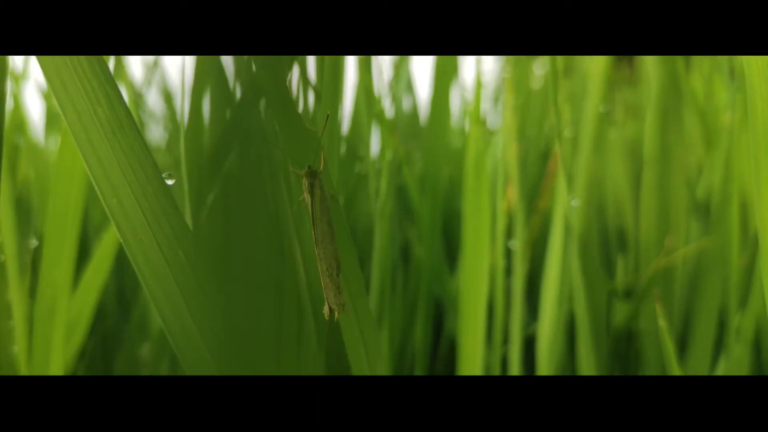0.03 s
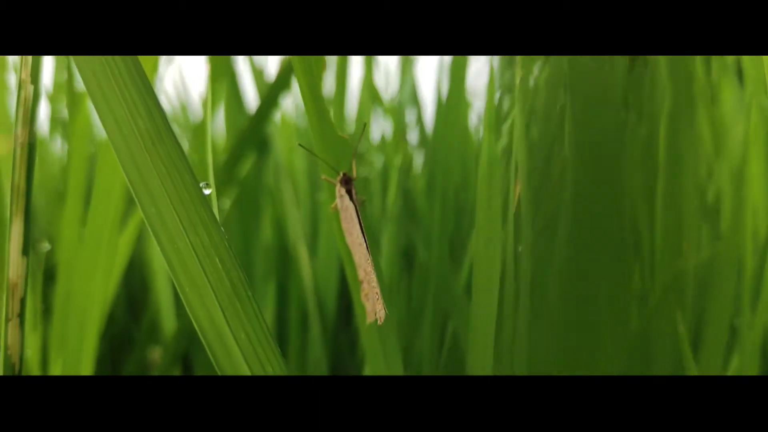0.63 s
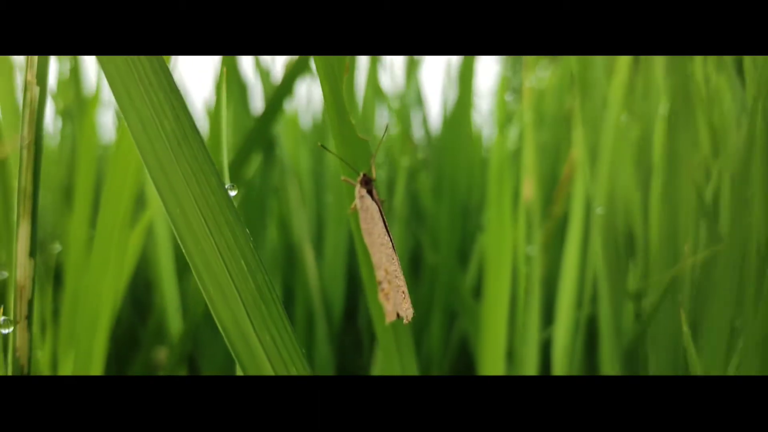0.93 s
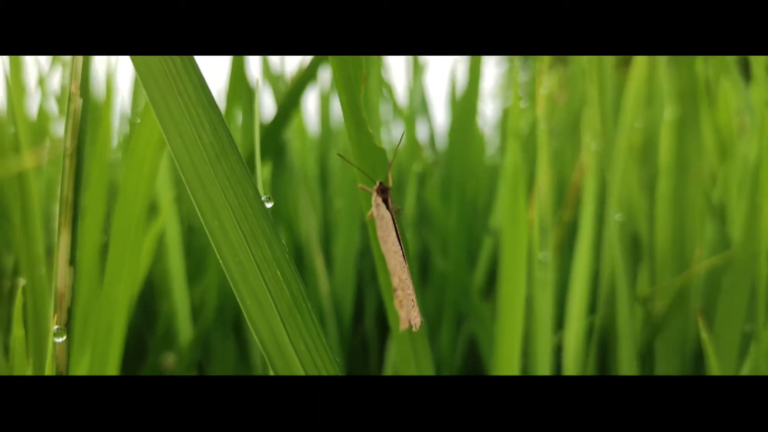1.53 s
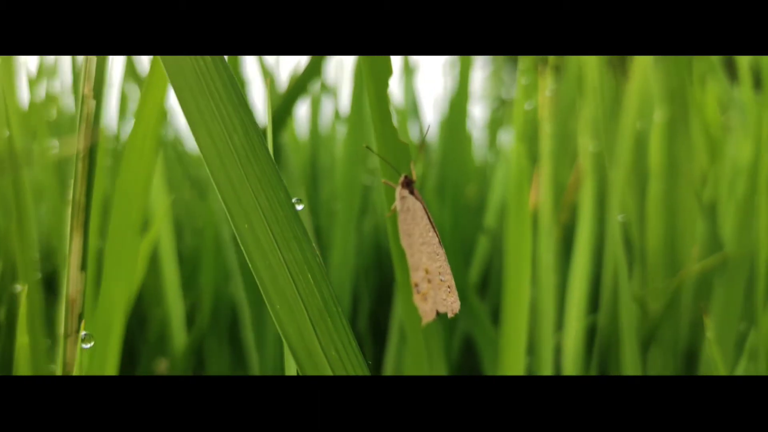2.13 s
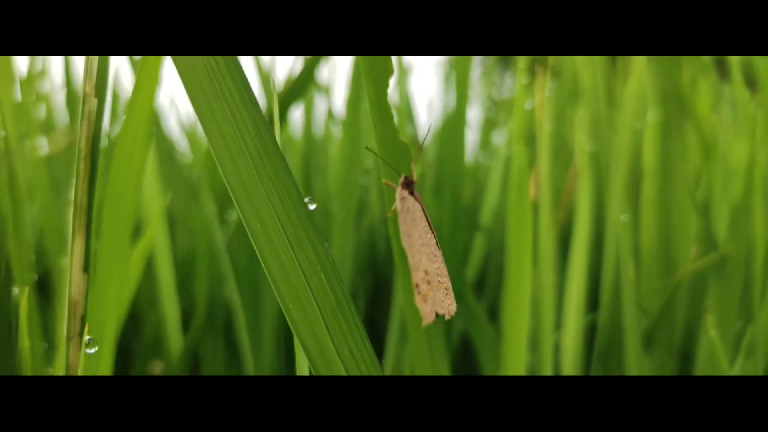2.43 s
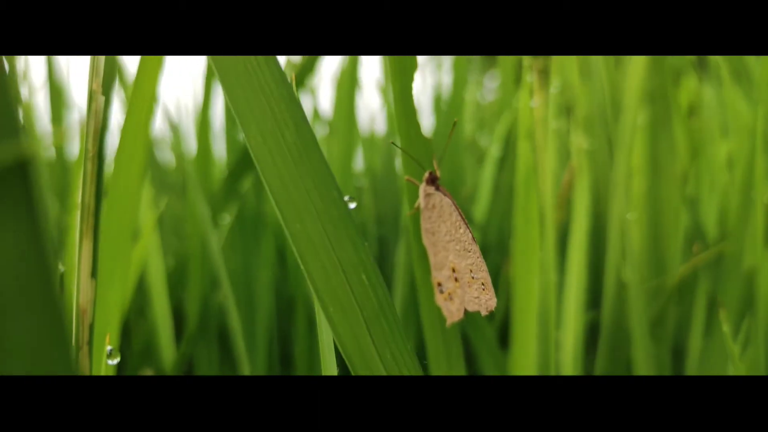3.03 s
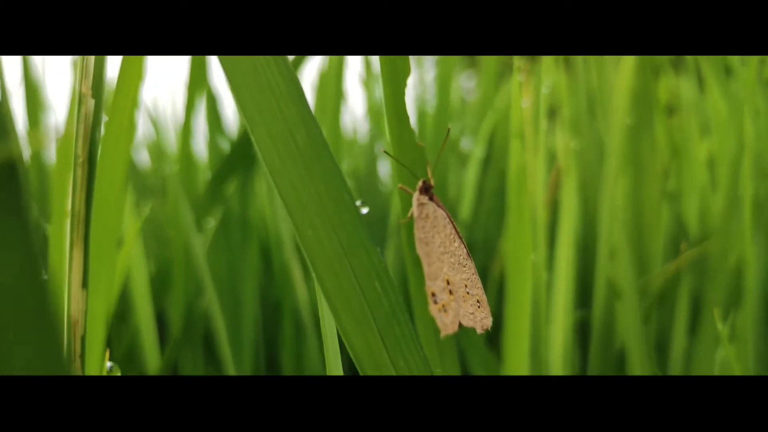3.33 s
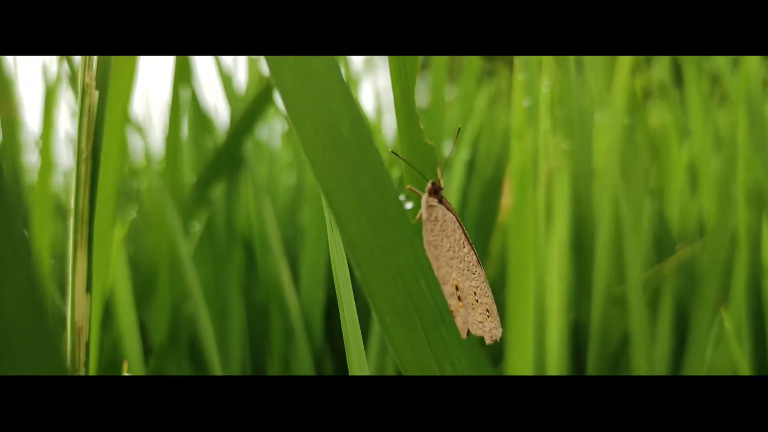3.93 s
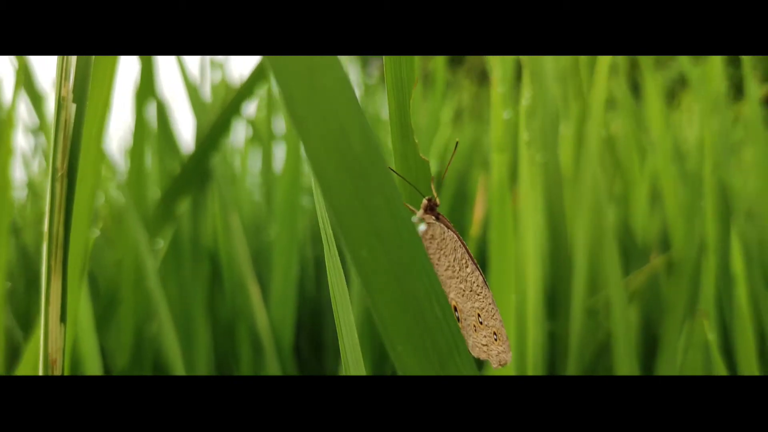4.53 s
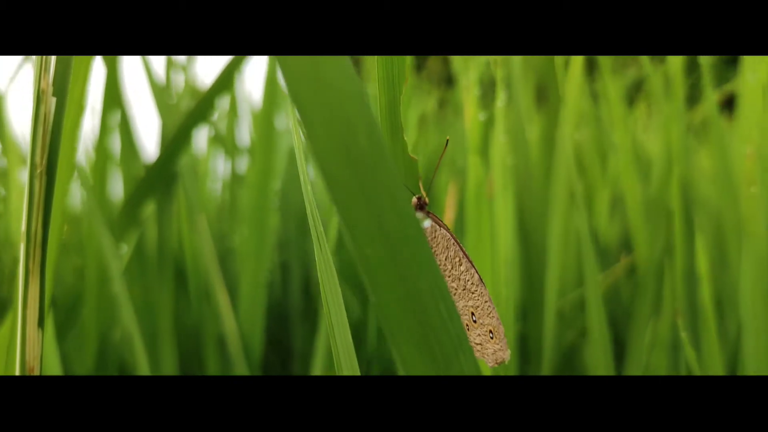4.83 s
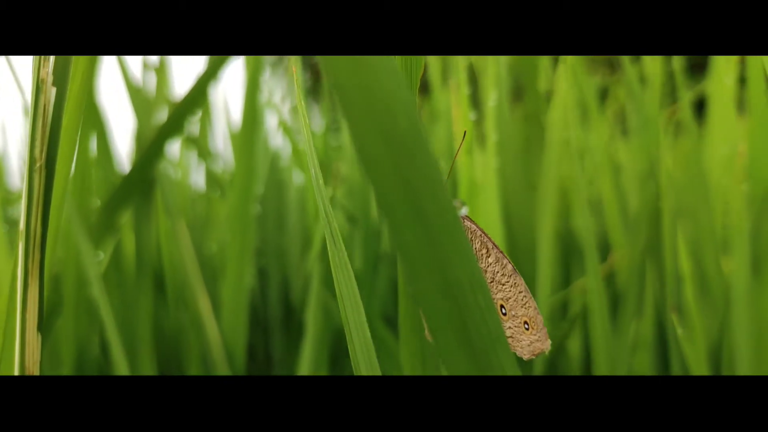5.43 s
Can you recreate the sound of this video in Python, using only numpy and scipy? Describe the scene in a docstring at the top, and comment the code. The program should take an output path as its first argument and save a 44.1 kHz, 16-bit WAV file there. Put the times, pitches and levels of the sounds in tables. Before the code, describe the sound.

Quiet outdoor chirping, a cricket and distant bird whistles, joined halfway by close leaves rubbing and clicking on the microphone, growing louder.

```python
"""Among wet rice leaves

Leaves swish past a camera, then drag and snap on its body, right beside the right microphone.
Their rough sound is many tiny clicks, made as they stick and slip. Small creatures chirp in quick
falling notes and a cricket throbs. Far off, a bird whistles and two hollow thumps sound, the second
one doubled. Behind it all lie a faint chorus of chirps, a steady insect hiss and a low rumble."""
import sys
import numpy as np
from scipy import signal
from scipy.fft import rfft, irfft
from scipy.io import wavfile
from scipy.ndimage import uniform_filter1d

SR = 44100
rng = np.random.default_rng(int(sys.argv[2]) if len(sys.argv) > 2 else 0)


def transcribe(u):
    """Save the signal u as a 16-bit wav file named by the first command-line argument.

    u: samples, shape (n,) or (channels, n), limited to [-1, 1]; the rate is SR.
    q: integer samples, one column per channel.
    """
    v = np.clip(np.atleast_2d(u).T, -1, 1)
    q = np.round(v * 32767).astype(np.int16)
    wavfile.write(sys.argv[1], SR, q)


N = 246078
TIME = np.arange(N) / SR

# A level_db sets a sound's strength before filters and echoes. A pan_db above zero means more left.
# leaves dragging on the camera body: start_s, end_s, level_db, swell_db (change from start to end)
LEAF_DRAGS = [(3.133, 3.175, -59, -17), (3.27, 3.34, -53.5, -14), (3.44, 3.505, -50.5, -8),
              (3.68, 3.73, -61, -9), (3.811, 3.91, -42.5, -11.5), (3.97, 4.11, -46.5, -3),
              (4.15, 4.247, -43.5, 7.5), (4.461, 4.555, -40, -4), (4.707, 4.8, -41, -4.5),
              (4.873, 4.95, -39, -11.5), (4.996, 5.032, -44.5, -2), (5.088, 5.29, -43.5, 13),
              (5.432, 5.531, -39, -7.5)]
# leaf edges snapping free: time_s, level_db, bass_boost_db
LEAF_SNAPS = [(3.1722, -29.5, 22), (3.4774, -23.5, 26), (3.7029, -33, 22), (3.9793, -29.5, 2),
              (4.0567, -26, 18), (4.2026, -26, -9), (4.2602, -33, -9), (4.2783, -29.5, 0),
              (4.2916, -27.5, 1), (4.308, -32.5, 15), (4.613, -26, 8), (4.6332, -26, -1), (4.6747, -33, 3),
              (4.7073, -25.5, -21), (4.879, -40, 17), (4.926, -23.5, 14), (5.0113, -24.5, 8),
              (5.094, -30, -11), (5.146, -28, -4), (5.1793, -19, 2), (5.2517, -20.5, 1), (5.33, -35, 7),
              (5.3845, -16.5, 1), (5.4474, -9, 4), (5.5147, -21.5, -3)]
# tone of the camera body when touched: frequency_hz, level_db
BODY_TONE = [(80, -11.5), (190, 5.5), (450, 5), (750, 2), (1700, 0), (1950, -4), (3100, -5.5), (3700, -3),
             (4900, -10.5), (6900, -8), (7700, -19.5), (9300, -27.5), (12000, -32), (15500, -50)]
# tone of one bright tick: frequency_hz, level_db
TICK_TONE = [(300, 7), (1500, 8.5), (5000, 1), (10000, 1), (15500, -7)]
# leaves sliding past: start_s, end_s, level_db, pan_db
LEAF_SWISHES = [(0.733, 0.752, -51, -9), (1.257, 1.33, -62.5, -4), (1.647, 1.69, -63, -12),
                (2.314, 2.377, -56.5, -5), (2.568, 2.593, -55.5, -7.5), (2.87, 2.91, -57.5, -7),
                (2.993, 3.1, -60.5, -2), (3.136, 3.146, -53, 1), (3.271, 3.288, -52, 2),
                (3.439, 3.494, -55, -3), (3.811, 3.873, -50, -2)]
# tone of a sliding leaf: frequency_hz, level_db
LEAF_TONE = [(200, 10.5), (900, -2), (2000, -2.5), (3700, 7.5), (4300, 3.5), (5000, 9), (6000, 1),
             (7200, 6.5), (9000, 2.5), (11000, -5), (15500, -13)]
# short runs of chirps from several callers: time_s, note_count, pitch_hz, level_db, pan_db
CHIRP_PHRASES = [(-.045, 3, 3146, -54, 6.5), (0.039, 1, 3100, -53, -5), (0.174, 2, 2990, -64, 5),
                 (0.338, 3, 3140, -54.5, 2), (.831, 2, 3060, -62, 11), (1.04, 2, 3120, -53.5, -4),
                 (1.128, 3, 3130, -56, 3), (1.382, 3, 3073, -61, 8), (1.553, 1, 3073, -50.5, 2),
                 (1.814, 2, 3110, -55, 7), (2.26, 2, 3123, -54.5, 6), (2.377, 1, 3057, -49, 3),
                 (2.636, 2, 3200, -55.5, 4), (2.95, 2, 3200, -52, 2.5), (3.354, 2, 3210, -57.5, 1),
                 (3.562, 3, 2960, -63, 4), (4.029, 2, 3116, -54.5, 7.5), (4.366, 2, 3166, -55.5, 8),
                 (4.829, 2, 3090, -51, 7), (5.084, 2, 2930, -60, 11), (5.486, 1, 3220, -52, 11)]
# spells of cricket song: first_throb_s, last_throb_s, throb_count, level_db
CRICKET_BOUTS = [(.03, 1.56, 13, -63), (3.49, 3.83, 3, -64), (4.02, 5.47, 12, -62)]
# the cricket's pitch over time: time_s, pitch_hz
CRICKET_PITCH = [(0, 8420), (1.6, 8230), (3.6, 8040), (5.5, 8100)]
# distant thumps: start_s, level_db, pitch_hz, half_length_s
FAR_THUMPS = [(1.886, -30, 298, 0.021), (2.778, -40.5, 375, 0.021), (2.821, -47.5, 400, 0.022)]
# distant bird whistles, plus one leaf squeak at 0.72 s: start_s, length_s, start_hz, end_hz, level_db
BIRD_WHISTLES = [(0.246, 0.0444, 2000, 1870, -66), (.435, .05, 2120, 2050, -62),
                 (0.547, .1, 2650, 2610, -60.5), (0.72, 0.066, 2300, 2304, -61.5),
                 (0.836, .05, 2060, 2030, -61), (1.16, 0.081, 2660, 2620, -58),
                 (1.91, 0.056, 2644, 2660, -56), (2.617, 0.089, 2620, 2610, -57),
                 (3.322, 0.11, 2610, 2540, -59.5), (3.898, 0.08, 4450, 3950, -56),
                 (4.267, 0.078, 3650, 4730, -60)]
# loudness of the distant chorus: time_s, level_db
CHORUS_LEVEL = [(0, -67), (1.5, -65.5), (2.05, -66.5), (3.6, -65), (5.5, -66)]
# bands of insect hiss: centre_hz, width_hz, level_db, pan_db, swell_db
INSECT_BANDS = [(6340, 980, -70, -0.5, 2), (9000, 2170, -73, 13, 0)]
# tone of the distant rumble: frequency_hz, level_db
RUMBLE_TONE = [(20, -4), (45, -3.5), (80, 0), (150, -3.5), (220, -10), (400, -16.5), (700, -20.5),
               (1200, -25), (2300, -28.5), (4500, -31), (7500, -36), (10000, -39), (11200, -41),
               (15500, -41)]
# how much of the rumble both sides share: frequency_hz, share (0 to 1)
RUMBLE_SHARE = [(30, 0.04), (70, 0.35), (140, 0.47), (300, 0.33), (700, 0.03), (1400, 0)]


def leaf_pressure(graze_from_s=2.85, graze_db=-59.5):
    """How hard the leaves press on the camera: unsteady strokes over a light, wavering touch."""
    graze = (TIME > graze_from_s) * from_db(graze_db + 2 * drift(24.93))
    return strokes(LEAF_DRAGS, attack_s=.0049, release_s=.025) * from_db(2.27 * drift(90)) + graze


def leaf_rubbing(pressure):
    """Leaves judder over the camera body, which gives their tiny slips its own tone."""
    slips = friction(slips_per_s=3500, grain_db=2.6, judder_db=2.2, judders_per_s=300)
    # the touching point wanders along the leaf, so its papery ringing comes and goes
    rings = sum(drift(35) * resonate(slips, hz, sharpness=12) for hz in np.geomspace(450, 4500, 12))
    sound = coloured(slips + .8 * rings, BODY_TONE)
    # even out the level, so that the pressure alone sets the loudness
    local_level = np.sqrt(uniform_filter1d(sound ** 2, size=600) + 1e-12)
    return pressure * sound / local_level


def leaf_snaps(ring_hz=760, ring_db=-7.5):
    """Leaf edges flick against the camera body, which answers with a short hollow ring."""
    out = np.zeros(N)
    for time_s, level_db, bass_db in LEAF_SNAPS:
        add(out, time_s - .001043, from_db(level_db) * snap(BODY_TONE, decay_s=.0011, bass_db=bass_db))
    out = filtered(out, 1, 300, "high")  # such light blows carry little bass
    return out + from_db(ring_db) * resonate(out, ring_hz, sharpness=3)


def leaf_flicks(pressure, per_s=40, boost_db=9):
    """Small edges catch at random, louder when the leaves press harder."""
    out = np.zeros(N)
    chances = np.clip(rng.standard_normal((N // 100, 3)), -2, 2)
    for k in range(int(per_s * N / SR)):
        late, loud, bass = chances[k]
        flick = snap(BODY_TONE, decay_s=.0008, bass_db=6 * bass)
        add(out, (k + late) / per_s, from_db(boost_db + 3 * loud) * flick)
    return out * pressure


def leaf_swishes():
    """Rough leaves slide by; their bright sound reaches both microphones through the air."""
    sides = []
    for side in (1, -1):  # left, then right
        rows = [(start, end, db + side * pan_db / 2, 0) for start, end, db, pan_db in LEAF_SWISHES]
        pressure = strokes(rows, attack_s=.0021, release_s=.012)
        slips = friction(slips_per_s=4000, grain_db=3.5, judder_db=1.5, judders_per_s=400)
        sides.append(pressure * coloured(slips, LEAF_TONE))
    return np.array(sides) * from_db(2 * drift(170))


def strokes(rows, attack_s, release_s):
    """Pressure of leaf strokes: each catches quickly, holds, swells or fades, then lets go softly."""
    out = np.zeros(N)
    for start_s, end_s, level_db, swell_db in rows:
        length_s = max(end_s - start_s, release_s)
        t = TIME[:int((length_s + release_s / 2) * SR)]
        contact = np.clip(np.minimum(t / attack_s, (length_s - t) / release_s + .5), 0, 1)
        add(out, start_s, contact * from_db(level_db + swell_db * (t / length_s - .5)))
    return out


def friction(slips_per_s, grain_db, judder_db, judders_per_s):
    """Sticking and slipping: tiny clicks of uneven size come in clumps, over a fine hiss."""
    sizes = from_db(grain_db * np.minimum(rng.exponential(1, N), 4)) * rng.choice([-1, 1], N)
    slips = rms_one(sizes * (rng.random(N) < slips_per_s / SR))
    clumps = from_db(judder_db * np.clip(drift(judders_per_s), -2, 2))
    hiss = .6 * rng.standard_normal(N)
    return rms_one((slips + hiss) * clumps)


def snap(tone, decay_s, bass_db, samples=1500):
    """A quick burst of slips as an edge lets go."""
    t = TIME[:samples]
    spectrum = rfft(rng.standard_normal(samples) * t / decay_s * np.exp(-t / decay_s))
    burst = irfft(spectrum / (np.abs(spectrum) + 1e-12), samples)  # all frequencies equally strong
    sound = coloured(burst * np.exp(-t / (10 * decay_s)), tone)
    sound = sound + (from_db(bass_db) - 1) * filtered(sound, 1, 1300, "low")
    return sound / np.sqrt(np.e * np.sum(sound ** 2) / (decay_s * SR))  # peak near one


def left_tick(start_s=4.1855, level_db=-25):
    """One bright tick at the left microphone."""
    out = np.zeros((2, N))
    add(out[0], start_s, from_db(level_db) * snap(TICK_TONE, decay_s=.0009, bass_db=0))
    return out


def chirps(note_spacing_s=.0565, step_hz=-37):
    """Small creatures call in notes that step down in pitch, each blurred by its path through leaves."""
    out = np.zeros((2, N))
    for time_s, count, pitch_hz, level_db, pan_db in CHIRP_PHRASES:
        for k in range(int(round(count))):
            fall = .22 * (1 + .15 * rng.standard_normal())
            note = falling_note(pitch_hz + step_hz * k, fall, length_s=.036)
            blurred = outdoors(note, echo_s=.09, echo_db=4.5)
            blurred /= np.sqrt(np.sum(blurred ** 2, axis=1, keepdims=True) / len(note))
            gain = from_db(level_db - 5 * abs(k - 1))  # favours the second note
            sides = panned(pan_db + 8.5 * rng.standard_normal())
            add(out, time_s + note_spacing_s * k - .024, blurred * gain * sides)
    return outdoors(out, echo_s=.15, echo_db=-3)


def falling_note(middle_hz, fall, length_s, overtone_db=-24):
    """One quick, slightly raspy downward slide; fall is the drop as a share of the middle pitch."""
    progress = np.linspace(0, 1, int(length_s * SR))
    rasp = .018 * np.interp(progress * 24, np.arange(25), rng.standard_normal(25))
    phase = phase_of(middle_hz * (1 + fall * (.5 - progress) + rasp))
    fade = signal.windows.tukey(len(progress), .5)
    return fade * (np.sin(phase) + from_db(overtone_db) * np.sin(2 * phase))


def cricket(width_hz=360, throb_width_s=.041, right_db=-12):
    """A cricket's high, narrow rasp throbs six to eight times a second, in spells."""
    power = np.zeros(N)
    for first_s, last_s, count, level_db in CRICKET_BOUTS:
        for time_s in np.linspace(first_s, last_s, int(round(count))):
            gain = from_db(level_db + .5 * rng.standard_normal())
            power += gain ** 2 * np.exp(-((TIME - time_s) / throb_width_s) ** 2)
    slow_noise = filtered(rng.standard_normal((2, 2, N)), 2, width_hz / 2, "low")
    phase = phase_of(in_time(CRICKET_PITCH))
    rasp = slow_noise[0] * np.cos(phase) + slow_noise[1] * np.sin(phase)  # noise moved up to the pitch
    return rms_one(rasp) * np.sqrt(power) * from_db([[0], [right_db]])


def thumps(echo_delay_s=.022):
    """Each distant thump is a brief, hollow low note followed by its outdoor echo."""
    direct = np.zeros(N)
    for start_s, level_db, pitch_hz, half_length_s in FAR_THUMPS:
        t = TIME[:int(2 * half_length_s * SR)]
        rise = t / (.33 * half_length_s)
        swell = rise ** 2 * np.exp(2 * (1 - rise))
        add(direct, start_s, from_db(level_db) * swell * np.sin(2 * np.pi * pitch_hz * t))
    echo = np.zeros((2, N))
    add(echo, echo_delay_s, outdoors(direct, echo_s=.43, echo_db=-4) - direct)
    return direct + echo


def bird_whistles():
    """A distant bird whistles thin, gliding notes that waver a little; a sliding leaf's short squeak is played
    the same way."""
    out = np.zeros(N)
    for start_s, length_s, start_hz, end_hz, level_db in BIRD_WHISTLES:
        n = int(length_s * SR)
        pitch_hz = np.linspace(start_hz, end_hz, n) * (1 + .005 * drift(300)[:n])
        add(out, start_s, from_db(level_db) * signal.windows.tukey(n, .5) * np.sin(phase_of(pitch_hz)))
    return outdoors(out, echo_s=.2, echo_db=-3) * from_db([[-3], [-7]])


def far_chorus(pitch_hz=3010, count=170):
    """Many more of the chirping creatures blend together far away."""
    out = np.zeros(N)
    for k, (late, sharp, loud) in enumerate(rng.standard_normal((count, 3))):
        note = falling_note(pitch_hz + 50 * sharp, fall=.13, length_s=.0455)
        add(out, (k + .3 * late) / count * N / SR, from_db(.23 * loud) * note)
    return rms_one(outdoors(out, echo_s=.25, echo_db=10)) * from_db(in_time(CHORUS_LEVEL))


def insect_hiss(first_swell_s=.41, swell_period_s=.728):
    """Countless tiny rasping insects blend into two bands of hiss; the lower one swells and sinks."""
    swell = np.cos(2 * np.pi * (TIME - first_swell_s) / swell_period_s)
    out = np.zeros((2, N))
    for centre_hz, width_hz, level_db, pan_db, swell_db in INSECT_BANDS:
        edges_hz = [centre_hz - width_hz / 2, centre_hz + width_hz / 2]
        hiss = rms_one(filtered(rng.standard_normal((2, N)), 2, edges_hz, "band"))
        out += hiss * from_db(level_db + swell_db * swell + drift(7.2)) * panned(pan_db)
    return out


def rumble(level_db=-51.5):
    """Distant rumble in the air; the two sides are partly alike, in the bass only."""
    common, left, right = rfft(rng.standard_normal((3, N)))
    share = np.clip(at_hz(RUMBLE_SHARE, np.fft.rfftfreq(N, 1 / SR)), 0, 1)
    noises = [irfft(np.sqrt(share) * common + np.sqrt(1 - share) * own, N) for own in (left, right)]
    sides = np.array([coloured(noise, RUMBLE_TONE) for noise in noises])
    return from_db(level_db) * sides * panned(-1.7)


def outdoors(sound, echo_s, echo_db):
    """A sound plus its scatter off stems and banks, different on each side, fading 60 dB in echo_s."""
    t = TIME[:SR // 3]
    paths = rng.standard_normal((2, len(t))) * from_db(-60 * t / echo_s)
    paths *= from_db(echo_db) / np.linalg.norm(paths, axis=1, keepdims=True)
    paths[:, 0] += 1  # the direct path
    return signal.oaconvolve(np.atleast_2d(sound), paths, axes=1)[:, :N]


def coloured(sound, tone, size=4096):
    """Shape a sound with a tone table; plain noise keeps its overall level."""
    cepstrum = irfft(np.log(from_db(at_hz(tone, np.fft.rfftfreq(size, 1 / SR)))))
    # this folding makes the filter ring only after a click, never before it
    cepstrum[1:size // 2] *= 2
    cepstrum[size // 2 + 1:] = 0
    pulse = irfft(np.exp(rfft(cepstrum)))
    return signal.fftconvolve(sound, pulse / np.linalg.norm(pulse))[:len(sound)]


def filtered(sound, steepness, edge_hz, keep):
    """Keep the low part, the high part or one band of a sound."""
    return signal.sosfilt(signal.butter(steepness, edge_hz, keep, fs=SR, output="sos"), sound)


def resonate(sound, pitch_hz, sharpness):
    """The part of a sound that rings near one pitch."""
    return signal.lfilter(*signal.iirpeak(pitch_hz, sharpness, fs=SR), sound)


def drift(per_s):
    """A random wander of typical size one, heading for a new value per_s times a second."""
    return rms_one(np.interp(TIME * per_s, np.arange(N), rng.standard_normal(N)))


def add(out, start_s, sound):
    """Mix a sound in at a given time."""
    start = int(round(start_s * SR))
    first, last = max(start, 0), min(start + sound.shape[-1], N)
    if last > first:
        out[..., first:last] += sound[..., first - start:last - start]


def phase_of(pitch_hz):
    """The running angle of a wave whose pitch changes."""
    return 2 * np.pi * np.cumsum(pitch_hz) / SR


def in_time(rows):
    """Join a table's points into a value for every sample."""
    return np.interp(TIME, *np.transpose(rows))


def at_hz(rows, hz):
    """Read between a table's frequencies, giving each octave equal room."""
    known_hz, values = np.transpose(rows)
    return np.interp(np.log(hz + 1), np.log(known_hz), values)


def panned(pan_db):
    """Left and right gains that differ by pan_db."""
    return from_db(np.array([[pan_db], [-pan_db]]) / 2)


def from_db(db):
    """Turn decibels into a multiplier."""
    return 10 ** (np.asarray(db) / 20)


def rms_one(sound):
    """Scale a sound to an average (root mean square) level of one."""
    return sound / np.sqrt(np.mean(sound ** 2) + 1e-20)


def scene():
    """The rice field, with leaves touching the camera on the right and only a trace on the left."""
    background = rumble() + far_chorus() + insect_hiss()
    field = background + chirps() + cricket() + bird_whistles() + thumps() + leaf_swishes()
    pressure = leaf_pressure()
    tick = left_tick()
    touching = leaf_rubbing(pressure) + leaf_snaps() + leaf_flicks(pressure)
    return field + tick + touching * from_db([[-30], [0]])


def record(dry):
    """Cut the highest treble steeply, above 15900 Hz."""
    return signal.sosfilt(signal.ellip(10, .1, 70, 15900, fs=SR, output="sos"), dry)


dry = scene()
out = record(dry)
transcribe(out)
```